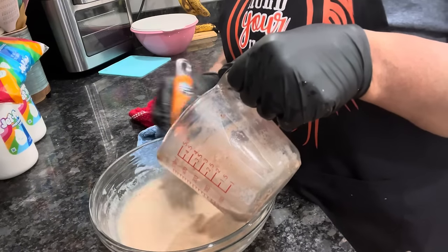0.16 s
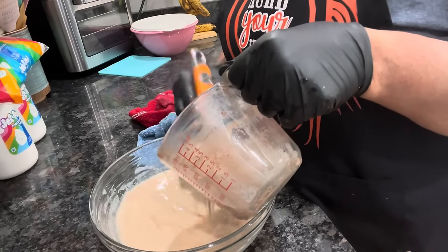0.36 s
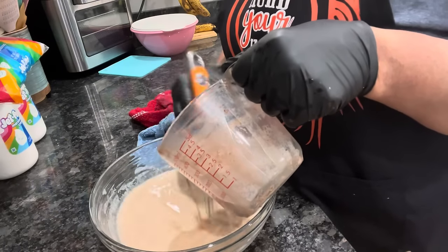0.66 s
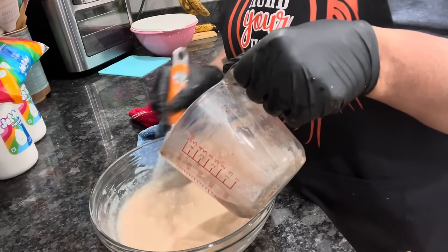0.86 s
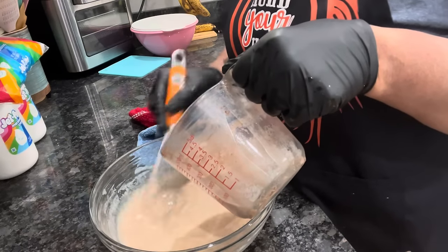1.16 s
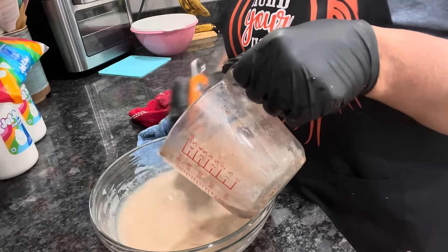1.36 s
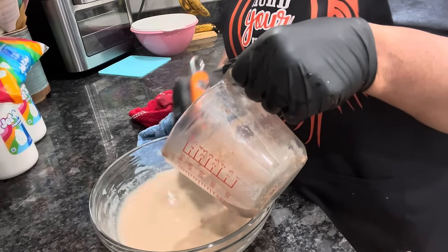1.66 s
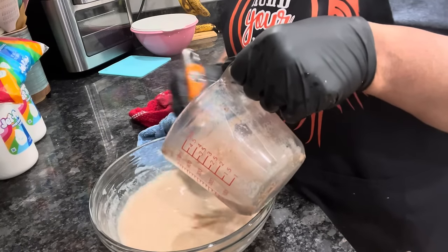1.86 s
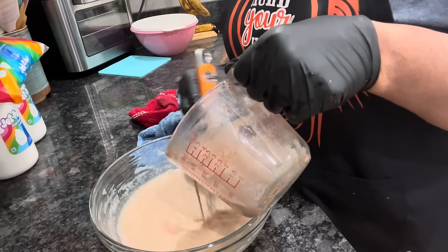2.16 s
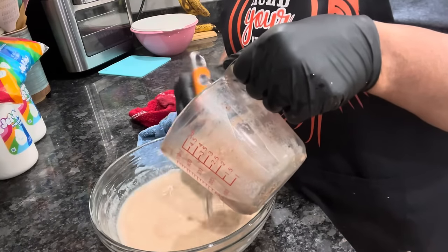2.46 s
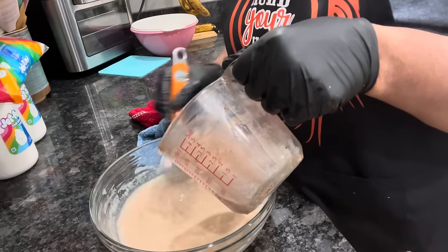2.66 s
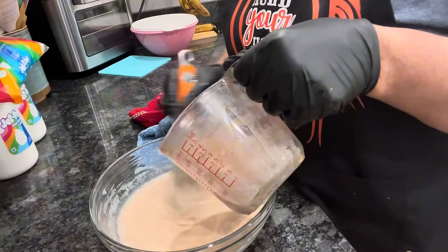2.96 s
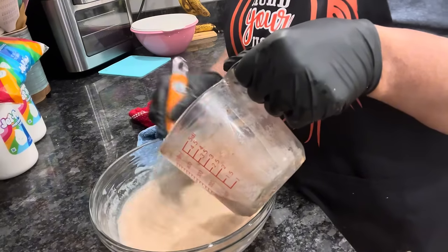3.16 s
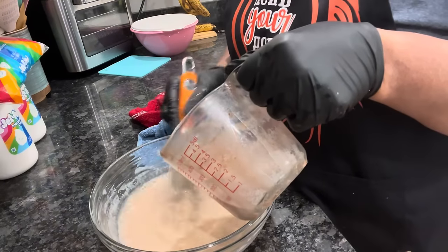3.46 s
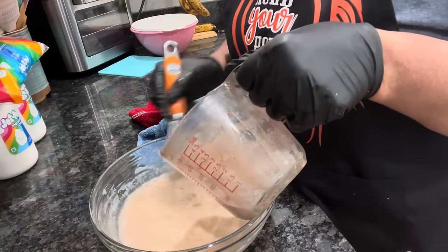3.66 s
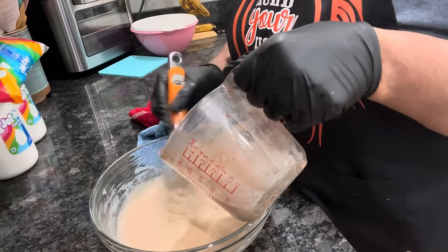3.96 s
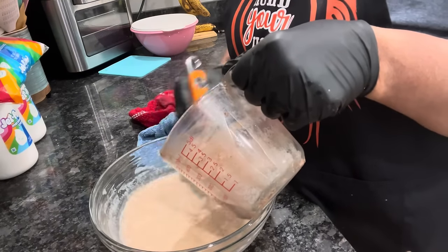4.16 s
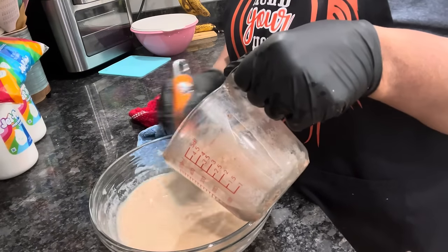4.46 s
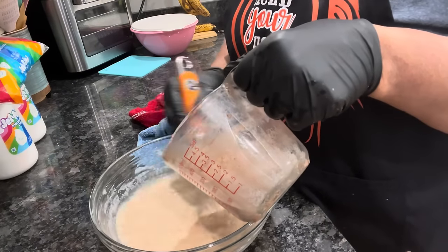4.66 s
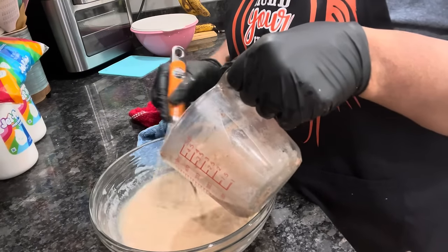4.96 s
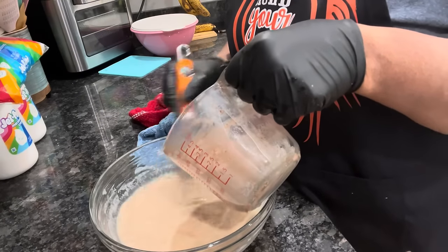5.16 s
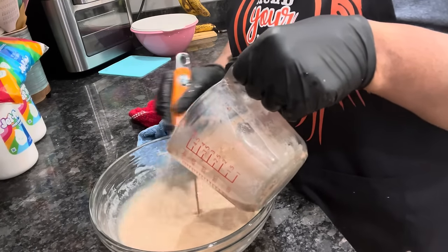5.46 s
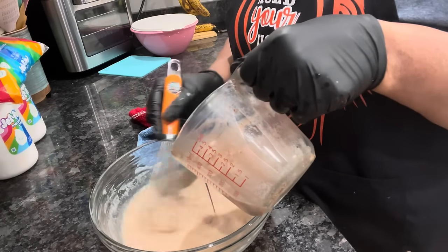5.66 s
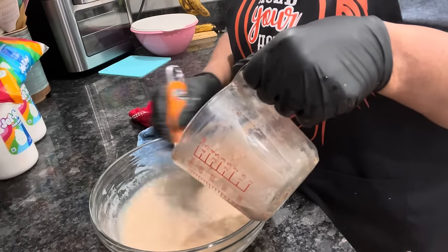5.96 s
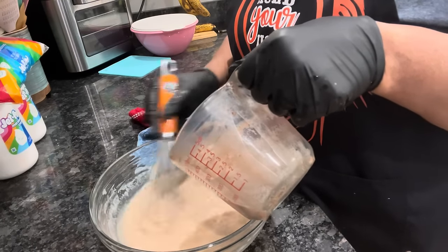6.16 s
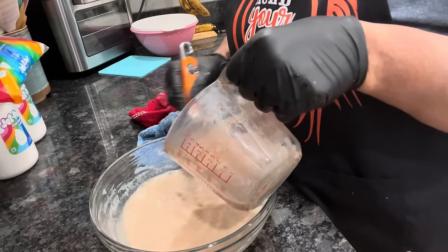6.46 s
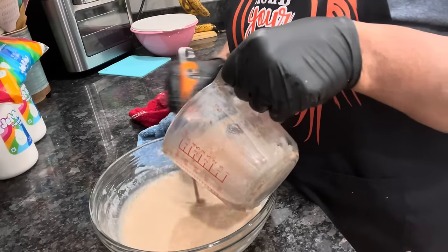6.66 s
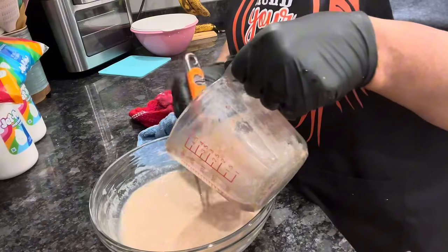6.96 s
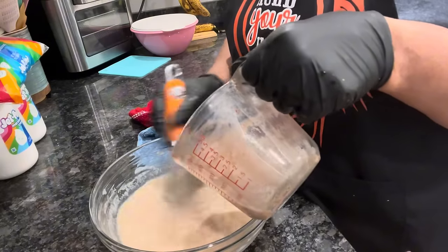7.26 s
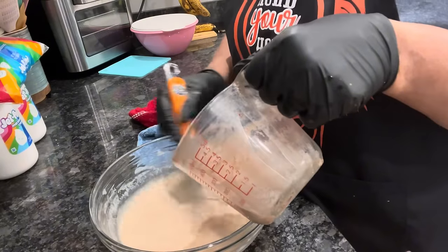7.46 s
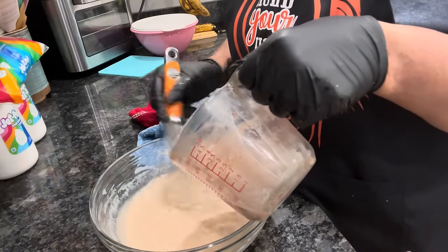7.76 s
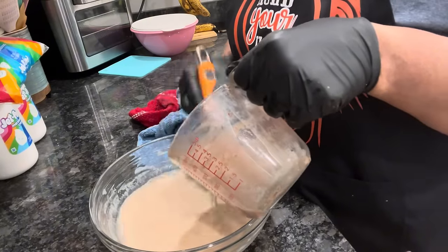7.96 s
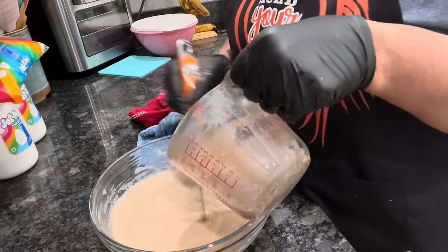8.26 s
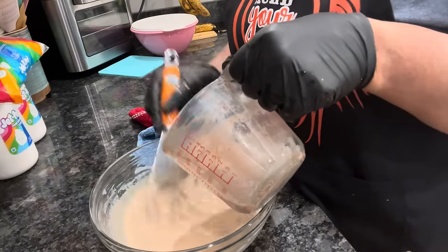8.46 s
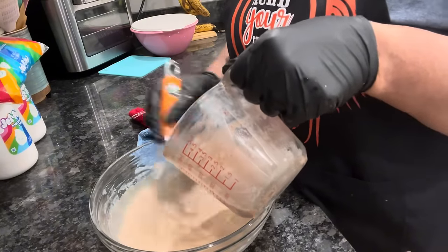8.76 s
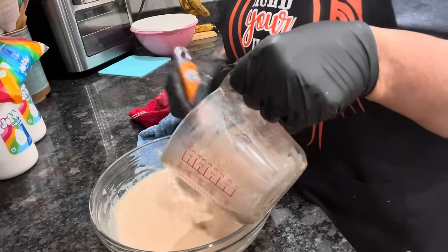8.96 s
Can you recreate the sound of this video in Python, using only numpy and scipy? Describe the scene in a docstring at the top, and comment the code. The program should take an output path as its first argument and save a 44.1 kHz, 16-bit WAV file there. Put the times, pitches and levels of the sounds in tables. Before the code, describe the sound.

From the start, a wire whisk beats thin batter in a glass bowl, heard close up in stereo in a kitchen with short reflections and a faint low rumble and hum. For about 3.3 seconds the strokes are fairly regular, three a second: a bright, many-wired clatter with a splash, then a lighter tap and a scrape along the wall. Faint squeaks precede many plunges, troughs gurgle, and bubbles plop, strongest around 3.3-3.6. From about 4 the strokes grow uneven, with deeper swishing, low gulps around 4.4-4.6, 5.8-5.9 and 7.2-7.4, and short glassy clinks near 4.1, 5.0, 5.3 and 6.3-6.7. Soft hollow jug touches on the rim come at 6.8-7.2, 8.2 and 8.9. Plunges become sparser after 7.5. At 9.0 the jug knocks the bowl with a ringing clunk, a low counter thump and a small splash, followed by a light wire tap.

```python
"""A wire whisk beats thin batter in a glass bowl, about three turns a second, close by in a kitchen.
Each turn plunges onto the glass with a splash, then wires tap the far wall and scrape along it.
The first, wide strokes squeak on the way down, some troughs gurgle shut and large bubbles plop; then
the whisk stays deep, swishing and gulping, and single wires or the bowl wall clink. Late on, a glass jug
held over the bowl softly touches the rim, and knocks it at the end. Noise and sines drive resonators."""
import sys
import numpy as np
from scipy import signal
from scipy.fft import rfft, irfft, next_fast_len
from scipy.io import wavfile
from scipy.ndimage import uniform_filter1d

SR = 44100
rng = np.random.default_rng(int(sys.argv[2]) if len(sys.argv) > 2 else 0)


def persist_wave(psi):
    """Save psi, clipped to +-1, as 16-bit WAV."""
    counts = np.round(np.clip(psi, -1, 1) * 32767).astype(np.int16)
    wavfile.write(sys.argv[1], SR, np.atleast_2d(counts).T)


N = 401310
TIME = np.arange(N) / SR
SIZE = next_fast_len(N + SR)
FREQS = np.maximum(np.fft.rfftfreq(SIZE, 1 / SR), 1)

# Levels are nominal: trims and random unevenness follow in the functions.
# whisk plunges onto the glass: t/s, clatter/dB, treble/dB, splash/dB,
# f/Hz of the leading ring (a wire loop, or the bowl wall near 2 kHz)
PLUNGES = [(0.058, -31.5, -33, -40.5, 5860), (0.371, -31.5, -36, -41.5, 5430),
           (0.675, -29.5, -33.5, -37, 6270), (0.98, -30, -32.5, -39.5, 4270), (1.289, -30, -31, -39, 1980),
           (1.608, -31, -33, -43, 3140), (1.907, -32.5, -38, -41, 4700), (2.18, -31, -36, -40, 1970),
           (2.48, -34.5, -41, -41.5, 5540), (2.768, -34.5, -37, -42, 6100),
           (3.051, -33.5, -35.5, -43.5, 4250), (3.324, -29, -31.5, -40.5, 5900),
           (3.55, -27.5, -32.5, -39.5, 4360), (3.867, -40, -37.5, -40, 1980), (4.126, -32, -38, -41, 3980),
           (4.408, -37.5, -41, -43, 4140), (4.633, -35, -43.5, -42.5, 5170),
           (4.994, -28.5, -39, -46.5, 2740), (5.334, -33.5, -38, -45, 3490), (5.556, -31, -39, -39.5, 4770),
           (5.789, -36, -40, -42, 5380), (5.895, -32.5, -51, -43, 6060), (6.27, -32, -37, -41, 4080),
           (6.391, -27.5, -27.5, -41, 4240), (6.721, -33.5, -35, -44, 2950),
           (6.984, -35.5, -38.5, -43.5, 2960), (7.207, -39, -42, -48.5, 5300), (7.343, -52, -46, -41, 3200),
           (7.428, -39.5, -50, -44, 5300), (7.803, -27, -36, -41.5, 6020), (8.313, -32, -39.5, -41, 2040),
           (8.635, -39.5, -43.5, -49.5, 4240), (8.808, -42, -46, -45, 3630), (8.975, -32, -37.5, -42, 5330)]
# lifted wires tap the wall and scrape along it: t/s, clatter/dB, treble/dB, scrape/dB
TAPS = [(0.158, -33, -35, -48), (0.295, -49.5, -51.5, -59), (0.457, -31.5, -44, -44.5),
        (0.828, -36.5, -44, -53), (1.064, -33, -37.5, -45), (1.13, -33, -41.5, -44.5),
        (1.39, -33.5, -39.5, -43.5), (1.463, -38, -50, -46), (1.709, -33.5, -35, -40.5),
        (1.987, -38.5, -42, -43), (2.304, -34.5, -32.5, -41.5), (2.552, -41, -45, -50),
        (2.832, -36.5, -41, -43), (2.863, -42, -53, -59), (3.139, -39.5, -42, -42),
        (3.426, -39, -44.5, -54), (3.621, -35.5, -40.5, -56), (3.726, -31, -44, -60),
        (3.77, -39.5, -43.5, -55), (4.214, -34.5, -41, -43), (4.282, -38.5, -51, -43),
        (4.463, -52, -45.5, -63), (4.532, -33.5, -46, -49), (4.565, -37.5, -47, -42.5),
        (4.77, -41.5, -52, -44), (4.793, -37, -47, -43), (4.899, -39.5, -58, -66), (5.098, -32.5, -40, -59),
        (5.177, -40, -58, -51), (5.227, -33.5, -44, -40.5), (5.421, -40.5, -51, -56),
        (5.623, -39, -55, -46), (5.927, -41, -50, -53), (5.968, -40.5, -48, -47),
        (6.081, -44.5, -47, -45.5), (6.184, -35, -42.5, -58), (6.217, -41.5, -54, -64),
        (6.311, -41, -49, -43.5), (6.43, -35, -41, -42.5), (6.614, -32.5, -31, -40),
        (6.64, -38.5, -44, -55), (6.799, -44.5, -42, -58), (7.03, -43, -51, -49), (7.312, -39.5, -41, -53),
        (7.374, -40.5, -49, -63), (7.468, -39, -53, -56), (7.558, -41, -44, -67), (7.597, -33, -51, -43.5),
        (7.923, -33, -41, -59), (8.169, -40.5, -52, -47), (8.415, -33, -39.5, -40),
        (8.512, -37.5, -48, -66), (9.068, -42, -49, -63)]
TAP_SPLASH_DB = -13  # re the tap's clatter
HARD_DB = -29  # reference force of a hard blow
CRACK_DB, SKID_DB, HARD_GROWTH = -23.5, -42.5, 2.8  # levels at HARD_DB; their dB per dB of force
# wires dragged through batter: t/s, swish/dB, slosh/dB
DRAG = [(0.0, -51.5, -56.5), (0.5, -53.5, -60), (1.32, -50.5, -54), (2.02, -58, -62), (2.34, -54, -61.5),
        (3.04, -55, -56), (3.74, -47.5, -53.5), (4.06, -56, -56.5), (4.41, -48.5, -53.5),
        (5.06, -51.5, -57), (6.0, -43.5, -48.5), (6.06, -59, -50), (6.14, -46.5, -56.5), (6.3, -46.5, -56),
        (6.48, -51, -58), (7.25, -47, -48), (7.7, -47, -61), (7.93, -58, -54.5), (8.76, -50, -56),
        (8.88, -58.5, -61.5), (8.96, -45, -54)]
LIFT_DB, LIFT_LEAD_S, LIFT_S = -1, 0.079, 0.055  # drag eases before each plunge
# modes of the filled bowl: f/Hz, width/Hz, gain/dB over the bare contact
BOWL_MODES = [(293, 37.4, 9.5), (571, 16, 10), (856, 43, 9), (1234, 25.5, 10.5), (1686, 78, 7.5),
              (1968, 107, 12.5), (2275, 63, 9.5), (2722, 68, 10), (2960, 23, 10), (3510, 350, 4.5),
              (4210, 96, 5.5), (5670, 690, 3), (7660, 140, 3), (10770, 2100, 3.5)]
# relative spectra: f/Hz, level/dB
CLATTER_SPECTRUM = [(150, -42), (500, -8), (1000, -1.5), (1600, -3.5), (3000, -3), (4500, -0.5), (6500, 3),
                    (8000, -4), (10000, -14)]
TREBLE_SPECTRUM = [(4500, -41), (6500, 1.5), (7500, 4), (8600, -4), (10500, 5.5), (12500, 0.5),
                   (14200, -3.5), (15500, -22)]
SCRAPE_SPECTRUM = [(200, -4), (700, -28), (1500, -1), (3000, 0.5), (5000, 1.5), (7000, 3), (8500, -2),
                   (11000, -2), (14000, -7), (15500, -41)]
SWISH_SPECTRUM = [(400, -34), (1200, -0.5), (2100, -5.5), (4000, -1), (6500, -1), (8500, -7), (11000, -8.5),
                  (14000, -14), (15500, -20)]
SPLASH_SPECTRUM = [(80, 5.5), (150, -4.5), (260, -0.5), (430, 2), (700, -1.5), (1000, 6), (1500, -8.5),
                   (2500, -8), (5000, -42)]
# trough gurgles shut: t/s, first f/Hz, last f/Hz, length/s, level/dB
GURGLES = [(.06, 846, 650, 0.023, -31), (.08, 703, 915, 0.029, -33.5), (0.392, 680, 903, 0.034, -35),
           (1.628, 518, 954, 0.049, -35.5), (1.666, 990, 1700, 0.0277, -43.5),
           (2.221, 616, 920, 0.051, -36), (2.487, 660, 900, 0.035, -36)]
# single large bubbles: t/s, starting f/Hz, level/dB
PLOPS = [(1.613, 540, -39), (2.016, 1470, -43), (2.802, 1510, -35), (3.344, 1470, -29.5),
         (3.565, 1534, -28), (3.583, 742, -27.5), (3.863, 807, -37), (4.165, 1555, -38),
         (4.792, 800, -36.5), (5.018, 860, -31.5)]
# air dragged deep under the batter: t/s, level/dB
GULPS = [(4.415, -40), (4.642, -35.5), (5.796, -39.5), (5.898, -34), (5.935, -33), (7.214, -33.5),
         (7.352, -40.5), (7.435, -36.5)]
# bowl modes rung by a gulp: f/Hz, level/dB, t60/s
GULP_MODES = [(131.6, -6, 0.057), (272.2, 0.5, 0.057), (548, -9.5, .06)]
# wire slides down bare glass: t/s, level/dB
SQUEAKS = [(0.037, -41), (.345, -47), (.555, -44.5), (0.653, -39.5), (0.959, -44), (1.225, -43),
           (1.271, -41.5), (1.505, -40), (1.587, -40.5), (1.885, -42.5), (2.452, -43), (2.61, -43),
           (2.735, -46), (3.308, -35), (6.348, -38)]
SQUEAK_S = .014  # half-length
# short clear ring of a freed wire, or of the bowl wall near 2 kHz: t/s, f/Hz, level/dB
CLINKS = [(.158, 3540, -35), (2.838, 3600, -32.5), (4.128, 4110, -24.5), (4.995, 4270, -22),
          (5.337, 1970, -24), (6.272, 3390, -30.5), (6.393, 4350, -29), (6.728, 3050, -28.5),
          (9.069, 4930, -35.5)]
# jug touches the rim softly: t/s, f/Hz, t60/s, level/dB
TOUCHES = [(6.77, 861, 0.049, -32.5), (6.865, 850, 0.057, -30.5), (7.027, 853, 0.058, -31),
           (7.093, 878, 0.052, -34), (7.204, 848, .05, -33), (8.224, 861, .16, -34),
           (8.257, 790, 0.022, -30), (8.932, 856, 0.18, -33)]
# jug against bowl, with a thump into the counter: f/Hz, level/dB, t60/s, delay/s
KNOCK_MODES = [(126, -26, .17, .008), (281, -24, .06, .006), (430, -25, .04, .005), (575, -21, .06, .003),
               (850, -18, .07, 0), (1244, -30.5, .12, 0), (1350, -22, .03, 0), (2153, -27, .28, 0),
               (3278, -43, .16, 0), (4576, -49, .4, 0), (6200, -38, .09, 0)]
KNOCK_S, JOLT_DB = 9.0195, -33.5  # the knock; the splash it shakes from the batter
# kitchen decay: f/Hz, t60/s
KITCHEN_DECAY = [(200, 0.39), (800, 0.32), (1400, 0.12), (4000, 0.14), (12000, 0.061)]
# low rumble, relative spectrum: f/Hz, level/dB
RUMBLE_SPECTRUM = [(20, -62), (43, -25), (59, 1), (87, -5), (129, 1), (172, -9), (220, -10.5), (290, -64)]
RUMBLE_DB = -54
MAINS_HZ, MAINS_DB = 60, -62
# two microphones: f/Hz, likeness/0-1, phase lead of left/rad, left minus right/dB
PORTS = [(60, .95, 0, 4), (150, .75, 0, 5), (330, .3, 1.5, 3.5), (850, .6, -1.2, 1.9),
         (2000, .65, -.9, 2.1), (3000, .45, -.6, 1.6), (4200, .38, -1.2, 2), (5600, .52, -2.6, 1.8),
         (7800, .75, -2.5, 0), (10600, .85, -.5, 0), (12500, .89, -.25, 0)]
CUTOFF_HZ = 16200


def strikes():
    """Times, clatter levels and treble levels of all blows on the glass: plunges, then taps."""
    return np.transpose([row[:3] for row in PLUNGES + TAPS])


def landings():
    """Stretches from blow to blow: (first sample, end sample, Hz of the leading ring or 0)."""
    landed = [(row[0], row[4]) for row in PLUNGES] + [(row[0], 0) for row in TAPS] + [(0.0059, 0)]
    landed.sort()
    starts = [max(int(s * SR) - SR // 250, 0) for s, _ in landed]  # 4 ms early
    return zip(starts, starts[1:] + [N], [hz for _, hz in landed])


def clatter(body_trim_db=7.0, treble_trim_db=9.0, brush_trim_db=9.5, crack_treble_db=-17.0):
    """The loops land within milliseconds of each other; in a hard blow they land at once and crack."""
    s, force_db, bright_db = strikes()
    plunge_s, _, _, splash_db, _ = np.transpose(PLUNGES)
    contacts = evened(grains(per_s=7000, spread_db=4.0), span_s=0.0046)
    # in a plunge one loop brushes the glass ahead of the others
    brush = bursts(plunge_s - .004, splash_db + brush_trim_db, rise_s=0.0011, t60_s=0.016)
    crack_db = CRACK_DB + HARD_GROWTH * (force_db - HARD_DB)
    crack = bursts(s, crack_db, rise_s=0.00034, t60_s=0.016)
    attack = np.hypot(brush, crack)
    body = bursts(s, force_db + body_trim_db, rise_s=0.00057, t60_s=0.066)
    treble = bursts(s, bright_db + treble_trim_db, rise_s=0.00014, t60_s=0.041)
    low = coloured(contacts, CLATTER_SPECTRUM) * np.hypot(attack, body)
    high = coloured(contacts, TREBLE_SPECTRUM) * np.hypot(attack * from_db(crack_treble_db), treble)
    return low + high


def sliding(drag_db, scrape_trim_db=7.5, swish_trim_db=-1.0):
    """Wires scrape on after each tap and each hard plunge, and swish along the wall in between."""
    plunge_s, plunge_db, *_ = np.transpose(PLUNGES)
    tap_s, _, _, tap_scrape_db = np.transpose(TAPS)
    skid_db = SKID_DB + HARD_GROWTH * (plunge_db - HARD_DB)
    pressure_db = np.r_[skid_db, tap_scrape_db] + scrape_trim_db
    pressure = bursts(np.r_[plunge_s, tap_s], pressure_db, rise_s=0.021, t60_s=0.17)
    pressure = pressure * from_db(3.5 * np.minimum(drift(74), 1.3))
    scrape = coloured(grains(per_s=9000, spread_db=0.5), SCRAPE_SPECTRUM) * pressure
    swish = coloured(froth_hiss(), SWISH_SPECTRUM) * from_db(drag_db + swish_trim_db) * grazes()
    return scrape + swish


def froth_hiss(patchy_db=3.5, flicker_hz=55, count=14):
    """Films of batter tear between the wires: patches of hiss, each pitch coming and going alone."""
    white = rng.standard_normal((2, 2, N))
    out = 0
    for k, hz in enumerate(np.geomspace(1000, 13000, count)):
        patches = from_db(patchy_db * np.minimum(drift(flicker_hz), 2))
        out = out + resonance(white[k % 2], hz, hz / 6) * patches
    return out


def grazes(per_s=36, spread_db=3.0, rustle=0.67):
    """Wires rub the wall at uneven moments, over a steady rustle; envelope of unit power."""
    times = np.cumsum(rng.exponential(1, size=600)) / per_s
    sizes_db = spread_db * np.clip(rng.standard_normal(len(times)), -2, 2)
    inside = times < TIME[-1]
    rubs = rms_one(bursts(times[inside], sizes_db[inside], rise_s=.002, t60_s=.07))
    return rms_one(np.hypot(rubs, rustle))


def loops(force, bare_db=-8.0, ring_db=3.0, lead_db=6.0, lead_width_hz=130):
    """Loops bend anew at each landing, so their many close modes shift; a plunge adds a leading ring."""
    at_rest_hz = np.linspace(np.sqrt(1400), np.sqrt(14500), 40) ** 2
    out = np.zeros((2, N + SR))
    for start, end, lead_hz in landings():
        push = np.pad(force[:, start:end], ((0, 0), (0, SR // 20)))
        bent_hz = at_rest_hz * rng.uniform(.95, 1.05, len(at_rest_hz))
        widths_hz = 60 + bent_hz / 90
        spread = np.clip(rng.standard_normal(len(at_rest_hz)), -2, 1.5)
        gains = from_db(ring_db) * rms_one(from_db(5.5 * spread))
        modes = zip(gains, bent_hz, widths_hz)
        rings = sum((-1) ** k * g * resonance(push, hz, width) for k, (g, hz, width) in enumerate(modes))
        if lead_hz:
            rings = rings + from_db(lead_db) * resonance(push, lead_hz, lead_width_hz)
        out[:, start:start + push.shape[1]] += rings
    return from_db(bare_db) * force + out[:, :N]


def wires(drag_db):
    """Struck wires ring freely; sliding wires, held against the glass, are only half free to ring."""
    held = sliding(drag_db)
    return loops(clatter() + held) + held


def bowl(force, bare_db=-2.5, uneven_db=3.0, detune=0.015):
    """Contacts sound bare and through glass modes favoured by the spot; moving batter bends them."""
    out = np.zeros((2, N + SR))
    for start, end, _ in landings():
        push = np.pad(force[:, start:end], ((0, 0), (0, SR // 10)))
        spot, load = np.clip(rng.standard_normal((2, len(BOWL_MODES))), -2, 2)
        gains = rms_one(from_db(uneven_db * spot))
        for (hz, width_hz, db), g, bend in zip(BOWL_MODES, gains, 1 + detune * load):
            added = g * (from_db(db) - 1)  # on top of the bare contact
            out[:, start:start + push.shape[1]] += added * resonance(push, hz * bend, width_hz)
    return from_db(bare_db) * (force + out[:, :N])


def drag():
    """Swish and slosh levels in dB: they follow the stirring and ease before each plunge."""
    s, *columns = np.transpose(DRAG)
    lift_db = LIFT_DB * sum(hump(row[0] - LIFT_LEAD_S, LIFT_S) for row in PLUNGES)
    return [np.interp(TIME, s, c) + lift_db for c in columns]


def batter(drag_db, splash_trim_db=6.5, slosh_trim_db=-1.5, lumpy_db=4.0):
    """The batter splashes just behind each blow and sloshes in between."""
    splashes = [(s, db) for s, _, _, db, _ in PLUNGES]
    splashes += [(s, db + TAP_SPLASH_DB) for s, db, *_ in TAPS]
    splashes += [(KNOCK_S, JOLT_DB)]
    s, level_db = np.transpose(splashes)
    froth = evened(coloured(bubbles(per_s=1100, cycles=11.8), SPLASH_SPECTRUM), span_s=0.065)
    splash = bursts(s, level_db + splash_trim_db, rise_s=0.0046, t60_s=0.2)
    slosh = from_db(drag_db + slosh_trim_db + lumpy_db * drift(10.0))
    return froth * np.hypot(splash, slosh)


def bubbles(per_s, cycles):
    """Small bubbles of 24 pitches, each falling by 60 dB in the given number of cycles."""
    born = grains(per_s, spread_db=3.0)
    pitches_hz = np.geomspace(170, 2200, 24)
    dealt = rng.integers(0, len(pitches_hz), N)
    return sum(ring(born * (dealt == k), hz, cycles / hz) * hz for k, hz in enumerate(pitches_hz))


def squeaks(hz=3590, upper_hz=5750, upper_db=-11, sag=0.02, light_db=-10, light_s=0.054):
    """Stick-slip of a wire feeds two glass modes: a faint wavering tone that swells as its pitch sags."""
    pressure, slide = 0, 0
    for s, db in SQUEAKS:
        light = from_db(light_db) * hump(s - SQUEAK_S, light_s)
        pressure = pressure + from_db(db) * np.hypot(hump(s, SQUEAK_S), light)
        slide = slide + (TIME - s) / SQUEAK_S * hump(s, 2 * SQUEAK_S)
    phase_per_hz = 2 * np.pi * np.cumsum(1 - sag * slide + .011 * drift(300)) / SR
    tone = np.sin(hz * phase_per_hz) + from_db(upper_db) * np.sin(upper_hz * phase_per_hz)
    return pressure * from_db(2 * drift(110)) * tone


def gurgles(rough_db=2.0, waver=0.02):
    """The hollow note of a trough glides unsteadily, mostly upward, swells and fades as it closes."""
    out, wobble = np.zeros(N), 1 + waver * drift(110)
    for s, first_hz, last_hz, length_s, level_db in GURGLES:
        closed = np.linspace(0, 1, int(length_s * SR))
        span = slice(int(s * SR), int(s * SR) + len(closed))
        hz = first_hz * (last_hz / first_hz) ** closed * wobble[span]
        envelope = np.sin(np.pi * closed * np.sqrt(closed))  # peaks past halfway
        out[span] += np.sin(2 * np.pi * np.cumsum(hz) / SR) * envelope * from_db(level_db)
    return out * from_db(rough_db * drift(100))


def plops(climb=0.31, climb_s=0.042, rise_s=0.0077, t60_s=0.043, rough_db=3.0):
    """A large bubble rings unevenly and climbs in pitch as it nears the surface."""
    out, t = np.zeros(N + SR), TIME[:SR // 8]
    pitch = 1 + climb * (1 - np.exp(-t / climb_s))
    for s, hz, level_db in PLOPS:
        note = np.sin(2 * np.pi * hz * np.cumsum(pitch) / SR)
        out[int(s * SR):int(s * SR) + len(t)] += note * swell(t, rise_s, t60_s) * from_db(level_db)
    return out[:N] * from_db(rough_db * drift(210))


def gulps(rise_s=0.0061, rough_db=3.0, waver=0.0394):
    """Deep air pockets shake the low modes of the filled bowl; moving batter bends their pitch."""
    s, level_db = np.transpose(GULPS)
    t, pushes, out = TIME[:SR // 4], impulses(s, from_db(level_db)), 0
    phase_per_hz = 2 * np.pi * np.cumsum(1 + waver * drift(41.0)) / SR
    for hz, db, t60_s in GULP_MODES:
        envelope = signal.fftconvolve(pushes, swell(t, rise_s, t60_s))[:N]
        out = out + from_db(db) * np.sin(hz * phase_per_hz) * envelope
    return out * from_db(rough_db * drift(69))


def clinks(rise_s=0.0006, t60_s=0.053, waver=.006):
    """A freed wire, or the bowl wall near 2 kHz, rings on briefly with an unsteady pitch."""
    out, t = np.zeros(N + SR), TIME[:SR // 4]
    flex = np.pad(1 + waver * drift(200), (0, SR), mode="edge")
    for s, hz, level_db in CLINKS:
        span = slice(int(s * SR), int(s * SR) + len(t))
        note = np.sin(2 * np.pi * hz * np.cumsum(flex[span]) / SR)
        out[span] += note * swell(t, rise_s, t60_s) * from_db(level_db)
    return out[:N]


def jug(rise_s=0.008, high_hz=1990, high_db=-20, sway_db=3.0):
    """Soft touches sound a low mode of the bowl and a faint higher one; the knock rings both glasses."""
    touches, t = np.zeros(N + SR), TIME[:SR // 4]
    for s, hz, t60_s, level_db in TOUCHES:
        note = np.sin(2 * np.pi * hz * t) + from_db(high_db) * np.sin(2 * np.pi * high_hz * t)
        touches[int(s * SR):int(s * SR) + len(t)] += note * swell(t, rise_s, t60_s) * from_db(level_db)
    knock = 0
    for k, (hz, db, t60_s, delay_s) in enumerate(KNOCK_MODES):
        click = impulses([KNOCK_S + delay_s], [from_db(db) * (-1) ** k])
        knock = knock + ring(click, hz, t60_s)
    return touches[:N] * from_db(sway_db * drift(130)) + knock


def kitchen(x):
    """Ten echo loops per channel between counter and walls, smeared by all-passes; treble dies sooner."""
    decay, out = np.log(1000) / over_hz(KITCHEN_DECAY), []
    for channel in x:
        lags_s = rng.uniform(0.0087, .04, size=10)
        trips = [np.exp(-(decay + 2j * np.pi * FREQS) * lag) for lag in lags_s]
        echoes = sum((-1) ** k * g / (1 - g) for k, g in enumerate(trips)) / np.sqrt(len(trips))
        smear = np.exp(-2j * np.pi * FREQS * rng.uniform(.001, .005, size=(3, 1)))
        diffusion = np.prod((smear - .6) / (1 - .6 * smear), axis=0)
        out.append(filtered(channel, diffusion * echoes))
    return np.array(out)


def rumble():
    """Steady low noise from two unrelated streams, blended into left and right by the microphones."""
    return from_db(RUMBLE_DB) * coloured(rng.standard_normal((2, N)), RUMBLE_SPECTRUM)


def mains_hum():
    """A steady sine at the mains frequency."""
    return from_db(MAINS_DB) * np.sqrt(2) * np.sin(2 * np.pi * MAINS_HZ * TIME)


def microphones(pair):
    """Blend a shared and an unshared part into left and right, with phase and shading of the ports."""
    alike = np.clip(over_hz(PORTS, axis=1), 0, .995)
    phase, balance_db = over_hz(PORTS, axis=2), over_hz(PORTS, axis=3)
    shared, unshared = rfft(pair, SIZE)
    side = np.array([[1], [-1]])
    blend = np.sqrt((1 + alike) / 2) * shared + side * np.sqrt((1 - alike) / 2) * unshared
    return irfft(blend * from_db(side * balance_db / 2) * np.exp(.5j * side * phase), SIZE)[:, :N]


def from_db(db):
    """Decibels to gain."""
    return 10 ** (np.asarray(db) / 20)


def rms_one(x):
    """Scale to unit power."""
    return x / np.sqrt(np.mean(x ** 2) + 1e-20)


def over_hz(table, axis=1):
    """One column of a table, joined up on a log-frequency axis."""
    table = np.array(table, float)
    return np.interp(np.log(FREQS), np.log(table[:, 0]), table[:, axis])


def filtered(x, response):
    """Apply a frequency response."""
    return irfft(rfft(x, SIZE) * response, SIZE)[..., :N]


def coloured(x, spectrum):
    """Shape a signal by a spectrum; rms 1."""
    return rms_one(filtered(x, from_db(over_hz(spectrum))))


def drift(corner_hz):
    """Random motion, low-passed at corner_hz; rms 1."""
    return rms_one(filtered(rng.standard_normal(N), 1 / (1 + (FREQS / corner_hz) ** 4)))


def impulses(times, heights):
    """Single clicks at given times."""
    out = np.zeros(N)
    np.add.at(out, np.clip(np.round(np.asarray(times) * SR).astype(int), 0, N - 1), heights)
    return out


def grains(per_s, spread_db):
    """Two unrelated streams of random clicks of uneven size."""
    sizes = from_db(spread_db * np.minimum(rng.exponential(1, (2, N)), 4))
    signs = rng.choice([-1, 1], (2, N))
    return sizes * signs * (rng.random((2, N)) < per_s / SR)


def evened(x, span_s=0.027):
    """Hold the short-term power steady, keeping the fine grain."""
    power = uniform_filter1d(x ** 2, max(int(span_s * SR), 8))
    return x / np.sqrt(np.maximum(power, 0) + 1e-3)


def bursts(times, level_db, rise_s, t60_s):
    """Envelope of blows that swell quickly and die away; their powers add."""
    t = TIME[:SR // 2]
    shape = (1 - np.exp(-t / rise_s)) * from_db(-60 * t / t60_s)
    power = signal.fftconvolve(impulses(times, from_db(level_db) ** 2), shape ** 2)[:N]
    return np.sqrt(np.maximum(power, 0))


def swell(t, rise_s, t60_s):
    """A soft onset and a ringing decay, of height 1."""
    shape = (1 - np.exp(-t / rise_s)) ** 2 * from_db(-60 * t / t60_s)
    return shape / shape.max()


def hump(s, length_s):
    """A smooth swell of height 1 around a moment."""
    return np.exp(-2 * np.minimum(((TIME - s) / length_s) ** 2, 20))


def ring(clicks, hz, t60_s):
    """A unit click sets a decaying sine of initial height 1 ringing."""
    r, w = from_db(-60 / (t60_s * SR)), 2 * np.pi * hz / SR
    return signal.lfilter([0, np.sin(w)], [1, -2 * r * np.cos(w), r * r], clicks + 1e-18)


def resonance(x, hz, width_hz):
    """Two-pole band-pass with gain about 1 at its centre."""
    r = np.exp(-np.pi * width_hz / SR)
    zeros = np.array([1, 0, -1]) * (1 - r * r) / 2
    return signal.lfilter(zeros, [1, -2 * r * np.cos(2 * np.pi * hz / SR), r * r], x + 1e-18)


def scene():
    """Whisk, batter and jug in the kitchen, over a low rumble and mains hum."""
    swish_db, slosh_db = drag()
    tones = gurgles() + plops() + gulps() + squeaks() + clinks() + jug()
    near = bowl(wires(swish_db) + batter(slosh_db)) + np.outer([1, 0], tones)  # tones: shared part only
    return microphones(near + from_db(-6) * kitchen(near) + rumble() + mains_hum())


def record(dry):
    """A steep elliptic low-pass cuts the top."""
    return signal.sosfilt(signal.ellip(10, .3, 80, CUTOFF_HZ, fs=SR, output="sos"), dry)


dry = scene()
out = record(dry)
persist_wave(out)
```